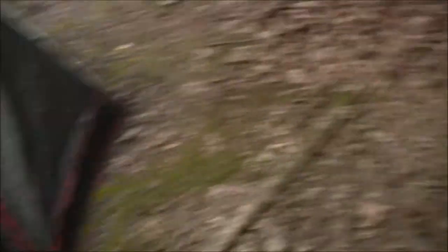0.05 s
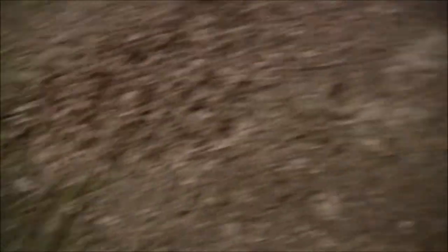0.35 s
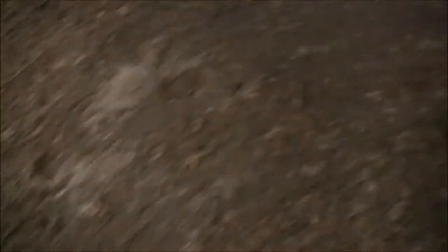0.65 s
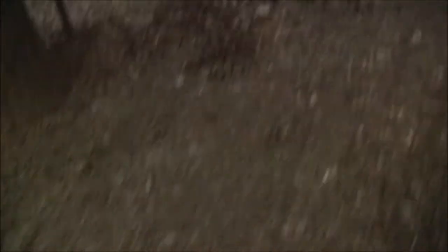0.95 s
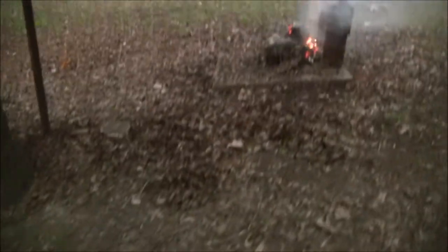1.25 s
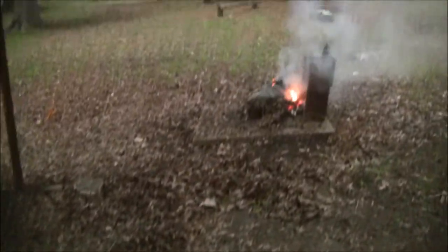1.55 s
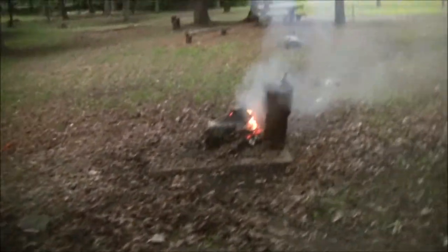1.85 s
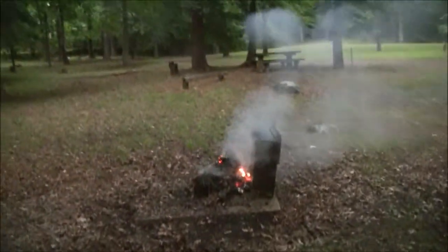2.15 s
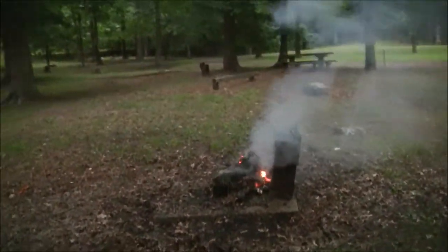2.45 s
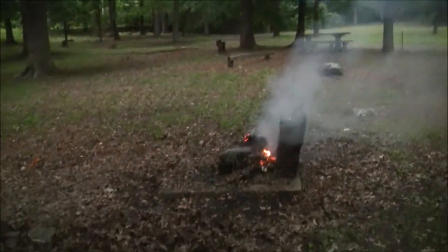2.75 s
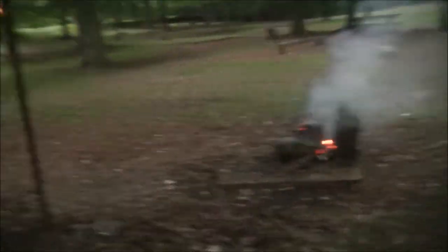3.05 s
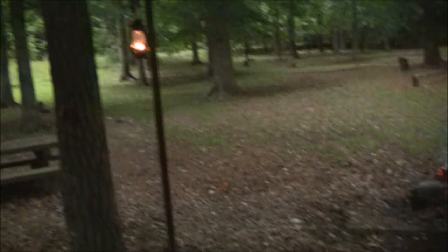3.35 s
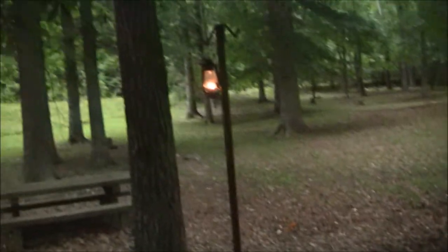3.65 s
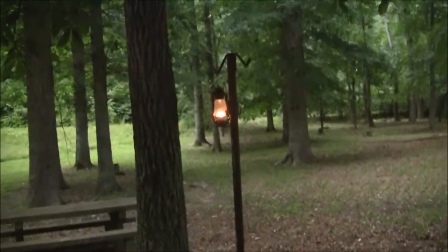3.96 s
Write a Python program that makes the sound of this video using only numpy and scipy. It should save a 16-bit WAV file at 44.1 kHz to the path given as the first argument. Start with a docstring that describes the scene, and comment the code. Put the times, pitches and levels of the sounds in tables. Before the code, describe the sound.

Rain falls steadily at a wooded campsite, heard over low handheld microphone rumble. Fat drips slap nearby and muffled footsteps thump. After one very close drip the level drops, and near the end a small fire gives one brief spit.

```python
"""Steady rain on a tent, trees and leaf litter at a wooded campsite: a wash of far drops and nearer patter
over the rumble of a carried camera. Single fat drips slap close by, among thin ticks from wet leaves and
a small fire. From 1 s soft steps thud through the camera. Near 1.6 s one very close drip makes the gain
control turn everything down, and it stays down. Just before the end the fire spits once."""
import sys
import numpy as np
from scipy import signal
from scipy.fft import rfft, irfft, next_fast_len
from scipy.io import wavfile
from scipy.ndimage import uniform_filter1d, map_coordinates

SR = 44100
rng = np.random.default_rng(int(sys.argv[2]) if len(sys.argv) > 2 else 0)


def master(y):
    """Save y as 16-bit WAV."""
    cut = np.clip(np.atleast_2d(y).T, -1, 1)
    pcm = np.round(cut * 32767)  # scale
    wavfile.write(sys.argv[1], SR, pcm.astype(np.int16))


N = 176400
SOFT_HZ, TOP_HZ = 12100, 15400  # high cut on drips and ticks; top of the whole mix


def amp(db):
    """Decibels to gain."""
    return 10 ** (np.asarray(db) / 20)


def panned(db):
    """Left and right gains, the left louder by db."""
    return amp([[db / 2], [-db / 2]])


def along(points, hz):
    """(f/Hz, value) breakpoints read on a log frequency axis."""
    freqs, values = np.transpose(points)
    return np.interp(np.log(hz + 1), np.log(freqs + 1), values)


def automation(rows):
    """(t/s, value) breakpoints drawn out to one value per sample."""
    return np.interp(np.arange(N) / SR, *np.transpose(rows))


def wobble(rate, size=N):
    """A smooth random modulator, rate knots a second."""
    knots = rng.standard_normal(int(size * rate / SR) + 4)
    return map_coordinates(knots, [np.arange(size) * rate / SR])


def filtered(x, response):
    """Zero-phase EQ; response gives the gain at each frequency."""
    size = next_fast_len(N + SR // 2)
    return irfft(rfft(x, size) * response(np.fft.rfftfreq(size, 1 / SR)), size)[..., :N]


def coloured(x, spectrum, size=2048):
    """Minimum-phase EQ, so that attacks stay sharp."""
    cepstrum = irfft(np.log(amp(along(spectrum, np.fft.rfftfreq(size, 1 / SR)))))
    cepstrum[1:size // 2] *= 2
    cepstrum[size // 2 + 1:] = 0
    impulse = irfft(np.exp(rfft(cepstrum)))
    return signal.fftconvolve(x, impulse[None], axes=1)[:, :N]


def softened(x):
    """A high cut softens the top of the drips, ticks and wood ring."""
    return signal.lfilter(*signal.butter(3, SOFT_HZ, fs=SR), x)


# Stereo image of the noise layers: f/Hz, left-right correlation
IMAGE = [(60, 0.21), (110, 0.24), (200, 0.48), (380, 0.3), (700, -0.014), (1290, -0.065), (2380, 0.12),
         (4400, 0.55), (8120, 0.66), (15000, 1)]


def spread(pair):
    """Two unrelated signals as mid (rms 1) and side: wide in the mids, narrow in the treble."""
    width = lambda hz: np.tan(np.arccos(np.clip(along(IMAGE, hz), -.5, 1)) / 2)
    mid, side = pair[0], filtered(pair[1], width)
    return np.array([mid + side, mid - side]) / mid.std()


def noise_bed(spectrum, patchy_db=0):
    """Coloured stereo noise, with optional patches of random gain across time and frequency."""
    bins = signal.stft(rng.standard_normal((2, N)), nperseg=512)[2]
    patches = uniform_filter1d(rng.standard_normal(bins.shape[1:]), size=8, axis=0)
    patches = uniform_filter1d(patches, size=6, axis=1)
    patches /= np.sqrt(np.mean(patches ** 2))
    pair = signal.istft(bins * amp(patchy_db * patches), nperseg=512)[1][:, :N]
    return spread(filtered(pair, lambda hz: amp(along(spectrum, hz))))


def shower(per_s, spectrum, t60, spread_db=3.5, max_drops=6000, size=256):
    """Drops of uneven size land at random, each a tiny noise burst."""
    t = np.arange(size) / SR
    chance = rng.random((max_drops, 2))[:int(per_s * N / SR)]
    bursts = rng.standard_normal((2, max_drops, size))[:, :len(chance)] * amp(-60 * t / t60)
    gains = amp(-spread_db * np.log(chance[:, 1:] + 0.025))
    where = ((chance[:, :1] * N).astype(int) + np.arange(size)).ravel()
    pair = np.array([np.bincount(where, (b * gains).ravel(), N + size)[:N] for b in bursts])
    return spread(coloured(pair, spectrum))


# Fader ride on the rain: t/s, level/dB
RAIN_RIDE = [(0, -27), (.22, -28), (.4, -26.5), (1.0, -26), (1.7, -25.5), (3.15, -26.5), (3.6, -27.5),
             (4, -28.5)]
# EQ of the far wash, the nearer patter and the finest drops: f/Hz, level/dB
WASH_EQ = [(100, -26), (170, -8), (316, -2.5), (459, -2), (631, -1), (1050, 0), (1580, 0), (3050, -1.5),
           (5060, -6.5), (7500, -10.5), (11300, -21), (15000, -32)]
PATTER_EQ = [(100, -16.5), (300, -3), (850, 1), (2200, 0.5), (4500, -1), (8000, -17.5), (12000, -25),
             (15500, -30)]
FIZZ_EQ = [(300, -29), (2000, 2), (4500, -2.5), (8000, -3), (12000, -13), (15500, -26)]


def rain():
    """Far drops blur into a fluttering wash, nearer ones patter and the finest fizz on top."""
    wash = amp(-0.92 + 0.32 * wobble(14)) * noise_bed(WASH_EQ, patchy_db=1.0)
    patter = amp(-6.5) * shower(per_s=900, spectrum=PATTER_EQ, t60=0.0043)
    fizz = amp(-13.5) * shower(per_s=380, spectrum=FIZZ_EQ, t60=0.0025)
    return amp(automation(RAIN_RIDE)) * panned(db=.5) * (wash + patter + fizz)


# Fader ride on the handling rumble: t/s, level/dB
RUMBLE_RIDE = [(0, -47.5), (.9, -48), (1.1, -44), (1.8, -39), (2.0, -45), (2.12, -40.5), (2.55, -52),
               (3.2, -45), (3.33, -43), (3.5, -48.5), (4, -56)]
# EQ of the rumble: f/Hz, level/dB
RUMBLE_EQ = [(20, 0.5), (40, -4.5), (60, -8.5), (110, 1.5), (190, -5.5), (270, -21), (600, -53)]


def camera_rumble():
    """Carrying the camera lays an unsteady low end under the rain."""
    return amp(automation(RUMBLE_RIDE) + 1.4 * wobble(15)) * noise_bed(RUMBLE_EQ)


# Cues for fat, close drips: t/s, level/dB, f/Hz, slap length/cycles
DRIP_CUES = [(.057, -16.5, 455, 1.3), (0.1006, -20.5, 396, 1.5), (0.319, -13, 3200, 1.3),
             (.399, -12.5, 5000, 3.1), (0.405, -22, 2800, 1.3), (0.684, -18, 4220, 1.5),
             (.728, -18, 3000, 3), (.736, -22, 3300, 2.5), (0.7428, -14.5, 2700, 2.3),
             (1.002, -13, 4500, 2.3), (1.213, -13, 3800, 2), (1.5557, -15, 3400, 1.03),
             (1.577, -2.4, 2500, 1.3), (1.627, -11, 715, 1.06), (1.692, -14.5, 525, 0.95),
             (1.8635, -7, 2400, 1.3), (2.0928, -15, 3000, 1.7), (2.552, -14, 2140, 1.5),
             (2.6176, -13, 3400, 1.7), (2.9012, -9.5, 5850, 3.2), (3.1434, -14.5, 2000, 1.1),
             (3.4726, -8.5, 3700, 2.5), (3.9138, -18, 4970, 3.5), (3.93, -16, 2000, 1.25)]
RING_DB, RING_T60_CYCLES = -13, 26
SPLASH_DB, SPLASH_T60_S = -16, .015


def drips():
    """Each fat drip is a slap of a few cycles at most, with a tail of brief ring and splash."""
    out, t = np.zeros((2, N)), np.arange(SR // 20) / SR
    spray = noise_bed(PATTER_EQ)
    for s, db, hz, cycles in DRIP_CUES:
        pan = panned(db=3 * rng.uniform(-1, 1))
        phase = 2 * np.pi * hz * t
        slap = np.exp(-(hz * t / cycles) ** 4)
        ring = amp(RING_DB - 60 * hz * t / RING_T60_CYCLES) * np.sin(phase + wobble(hz / 2)[:len(t)])
        splash = spray[:, round(s * SR):][:, :len(t)] * amp(SPLASH_DB - 60 * t / SPLASH_T60_S)
        drip = (1 - slap) * (splash - ring) - slap * np.sin(phase)
        add(out, s, amp(db) * pan * drip)
    return softened(out)


# Cues for leaf and ember ticks: t/s, level/dB, f/Hz
TICK_CUES = [(.0755, -25, 8000), (.1788, -27, 10000), (.268, -18, 7800), (.466, -19, 9500),
             (.4845, -25, 8000), (0.8739, -16.5, 6000), (.9388, -21.5, 9000), (1.213, -20, 6460),
             (1.4112, -19, 5930), (1.551, -19, 5500), (2.4323, -21, 4300), (2.608, -17.5, 5600),
             (2.671, -23, 8000), (3.059, -24, 7500), (3.223, -20, 6900), (3.4325, -24, 9000)]
TICK_T60_S, TICK_OCTAVES = 0.0073, 1.23


def ticks():
    """Wet leaves and embers tick dead centre, each a thin noise burst in a band of its own."""
    out, t = np.zeros((1, N)), np.arange(SR // 10) / SR
    for s, db, hz in TICK_CUES:
        edges = np.minimum(hz * 2 ** (np.array([-1, 1]) * TICK_OCTAVES / 2), TOP_HZ)
        burst = rng.standard_normal(len(t)) * amp(db - 60 * t / TICK_T60_S)
        tick = signal.lfilter(*signal.butter(2, edges, "bandpass", fs=SR), burst)
        add(out, s, tick / np.sqrt(2 * np.ptp(edges) / SR))  # make-up gain for the band-pass
    return softened(out)


# Cues for steps and handling thuds: t/s, level/dB, f/Hz at the peak, attack/s, left lead and right lag/rad
THUD_CUES = [(1.049, -27, 95, 0.019, 1.28), (1.137, -28, 181, 0.014, .7), (1.36, -16, 112, 0.0089, 0.71),
             (1.394, -26, 141, .012, 0.88), (1.51, -26, 113, 0.014, 1.1), (1.612, -9, 141, .009, 0.9),
             (1.64, -12, 110, 0.013, 1.37), (1.717, -22, 180.5, 0.024, 1.2),
             (1.853, -24.5, 188.5, 0.015, 0.55), (1.912, -24.5, 175, 0.014, 1.13),
             (2.052, -26.5, 157, 0.026, .6), (2.094, -27, 89, 0.011, 0.49), (3.297, -32, 111, .012, 0.49)]
THUD_SAG, THUD_WANDER_RAD = 0.11, .45  # a thud starts sharp by the fraction THUD_SAG


def steps():
    """Steps thud through the camera body: each swells, sags in pitch and dies, skewed between the mics."""
    out, t = np.zeros((2, N)), np.arange(SR // 4) / SR
    for s, db, hz, attack_s, skew in THUD_CUES:
        age = t / attack_s
        envelope = (age * np.exp(1 - age)) ** 2
        phase = 2 * np.pi * np.cumsum(hz * (1 + THUD_SAG) / (1 + THUD_SAG * age)) / SR
        wander = THUD_WANDER_RAD * np.array([wobble(122, size=len(t)) for mic in range(2)])
        add(out, s, amp(db) * envelope * np.sin(phase + np.array([[skew], [-skew]]) + wander))
    return out


# EQ of the fire's sizzle: f/Hz, level/dB
SIZZLE_EQ = [(500, -27), (3900, -10), (5000, 3), (5700, -6), (6500, 1), (7700, -2), (9700, 1), (11000, -7),
             (15500, -15)]
# Ring of the snapping wood: f/Hz, level/dB, t60/s
WOOD_MODES = [(4910, -24, .1), (6390, -34, .06)]
SPIT_AT_S, SIZZLE_DB, SIZZLE_ATTACK_S, SIZZLE_T60_S = 3.9418, -13, 0.0011, 0.053


def fire_spit():
    """The fire spits once: snapping wood rings under a short, bright sizzle."""
    ring, gate, t = np.zeros((1, N)), np.zeros((1, N)), np.arange(SR // 10) / SR
    for hz, db, t60 in WOOD_MODES:
        phase = 2 * np.pi * hz * t + wobble(300, size=len(t))
        add(ring, SPIT_AT_S, amp(db - 60 * t / t60) * np.sin(phase))
    attack = 1 - np.exp(-t / SIZZLE_ATTACK_S)
    add(gate, SPIT_AT_S, attack * amp(SIZZLE_DB - 60 * t / SIZZLE_T60_S))
    return softened(ring) + gate * noise_bed(SIZZLE_EQ)


def add(out, s, sound):
    """Mix a sound in at time s."""
    part = out[:, max(round(s * SR), 0):][:, :sound.shape[-1]]
    part += sound[..., :part.shape[1]]


def scene():
    """The dry mix at the camera."""
    return rain() + camera_rumble() + drips() + ticks() + steps() + fire_spit()


THRESHOLD_DB, DUCK_ATTACK_S, RELEASE_DB_PER_S = -7.7, .004, .1


def record(dry):
    """Gain control ducks the mix on a peak over the threshold and barely recovers; a high cut follows."""
    over_db = np.maximum(20 * np.log10(np.abs(dry.mean(0)) + 1e-9) - THRESHOLD_DB, 0)
    release_db = RELEASE_DB_PER_S * np.arange(N) / SR
    held_db = np.maximum.accumulate(over_db + release_db) - release_db
    pole = np.exp(-1 / (DUCK_ATTACK_S * SR))
    duck_db = signal.lfilter([1 - pole], [1, -pole], held_db)
    return filtered(dry * amp(-duck_db), lambda hz: hz < TOP_HZ)


dry = scene()
out = record(dry)
master(out)
```